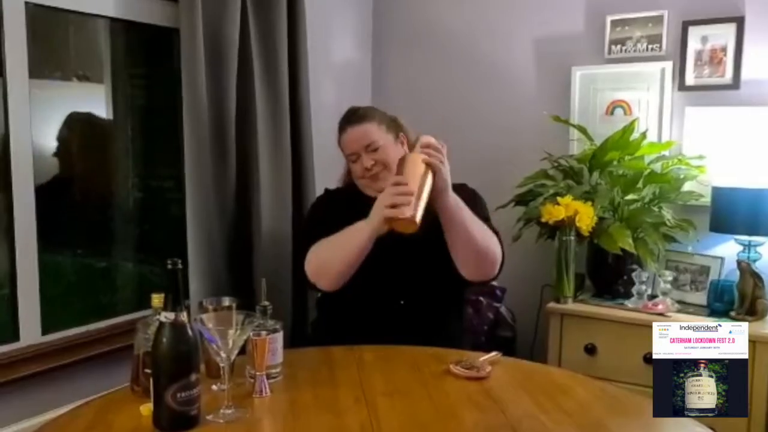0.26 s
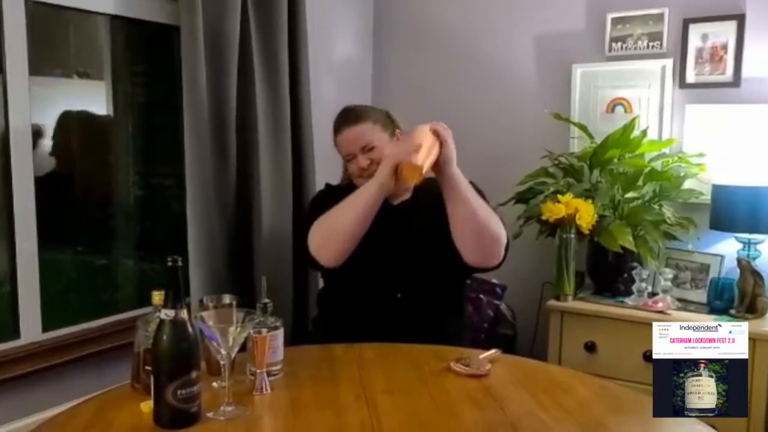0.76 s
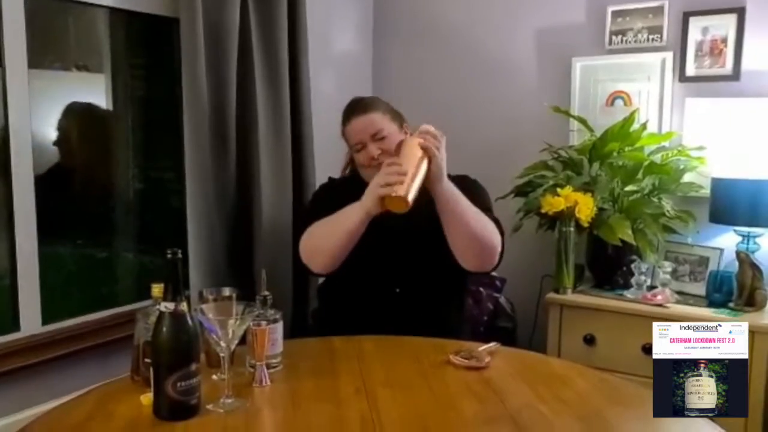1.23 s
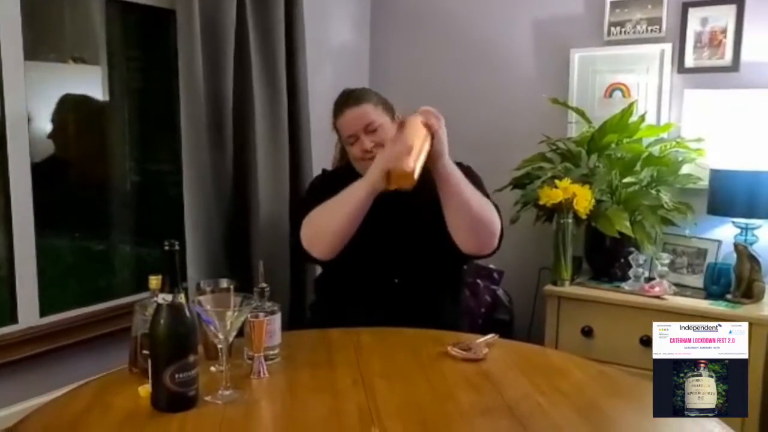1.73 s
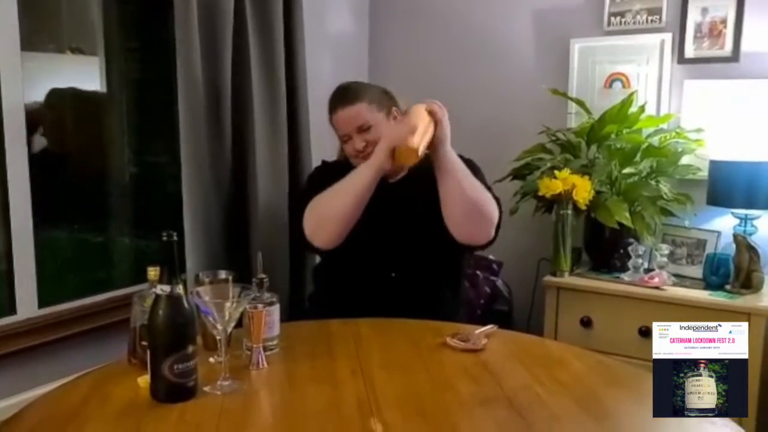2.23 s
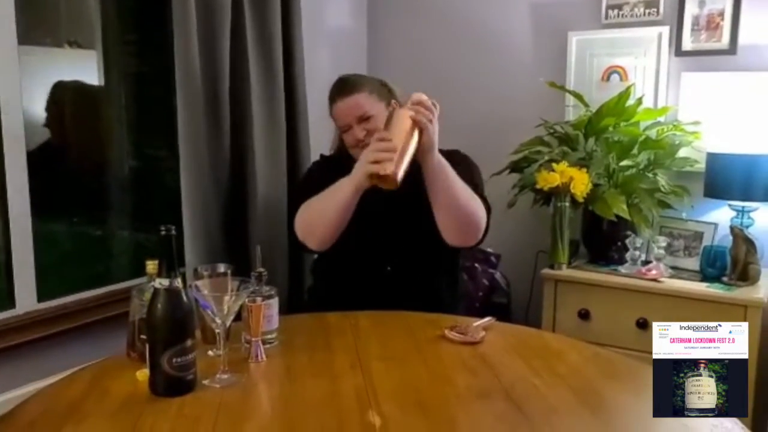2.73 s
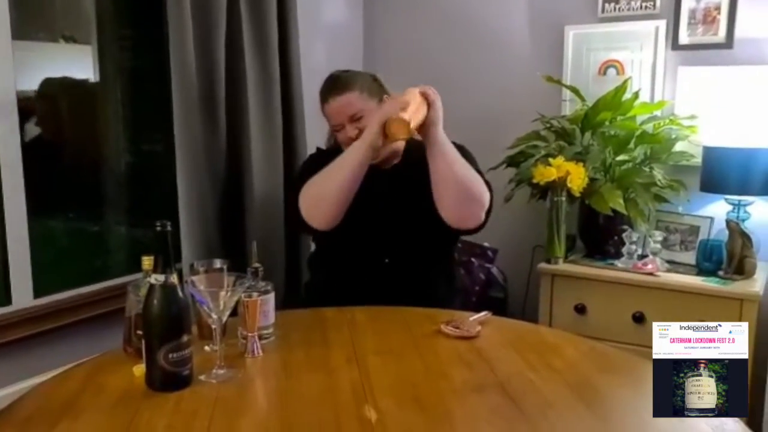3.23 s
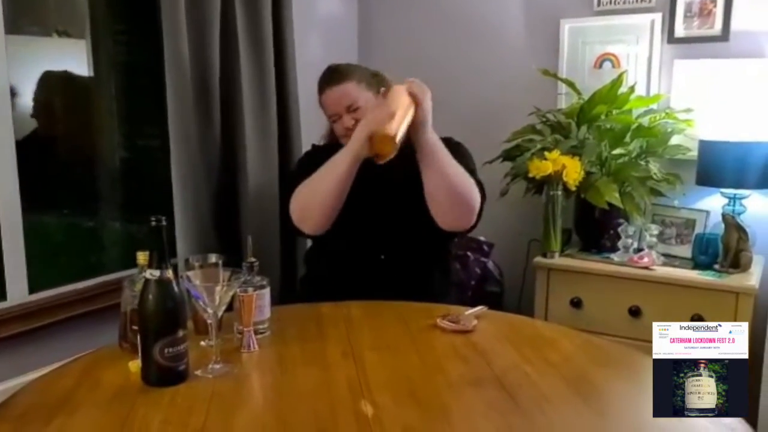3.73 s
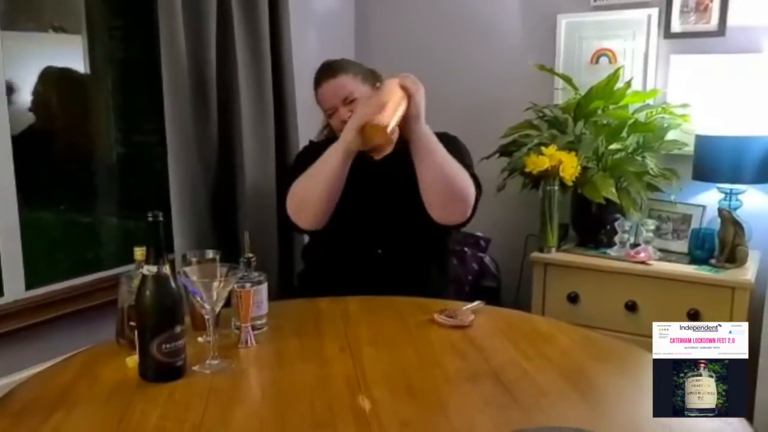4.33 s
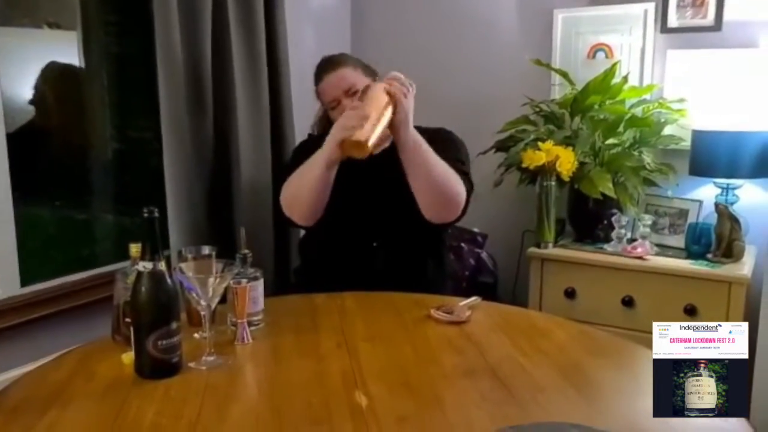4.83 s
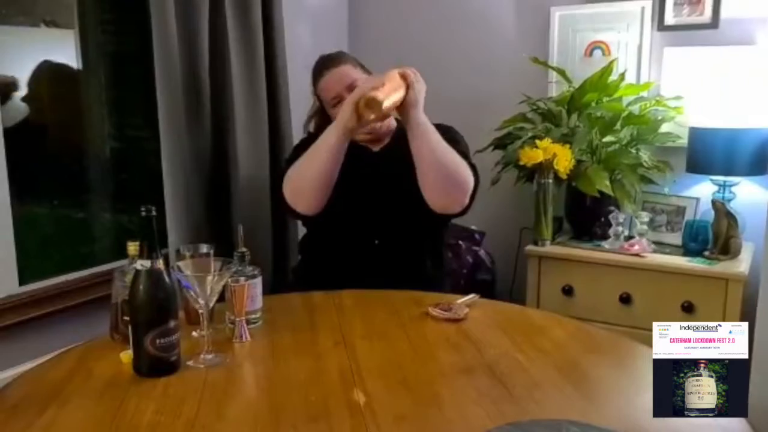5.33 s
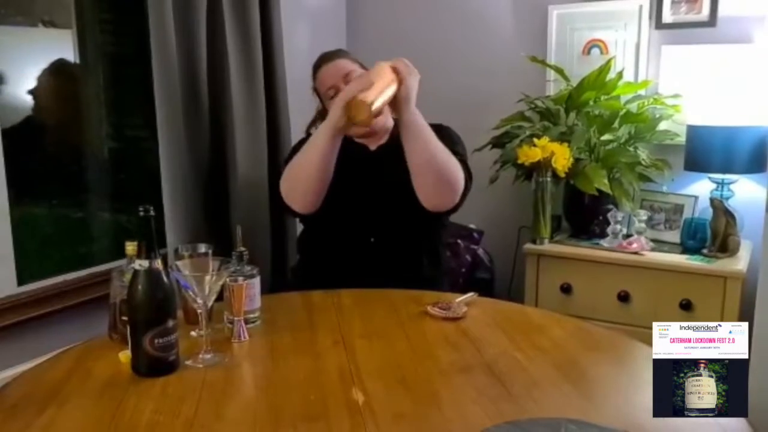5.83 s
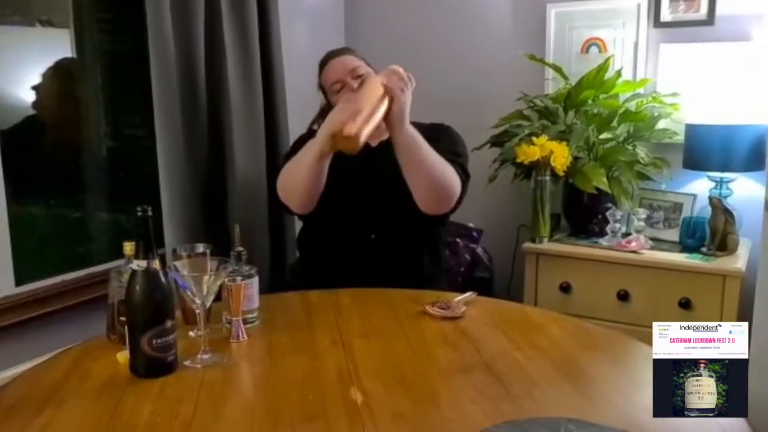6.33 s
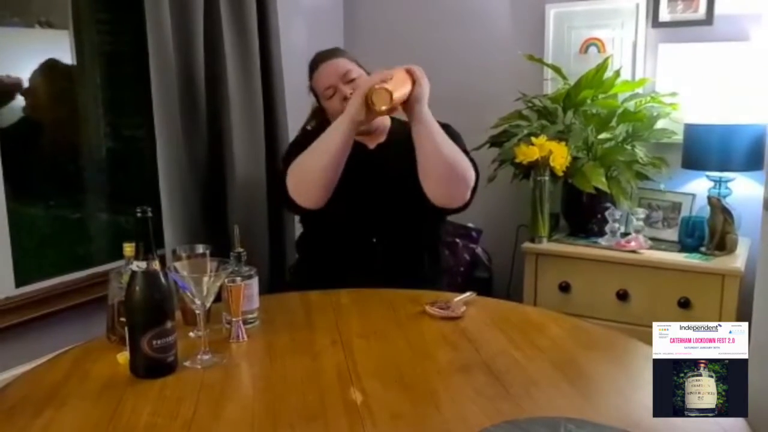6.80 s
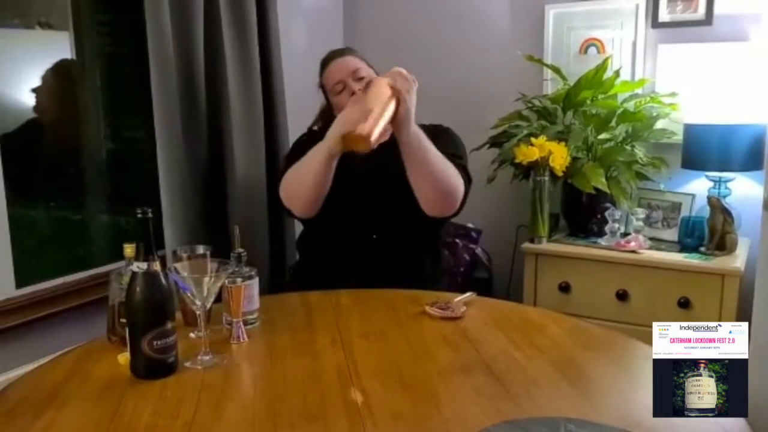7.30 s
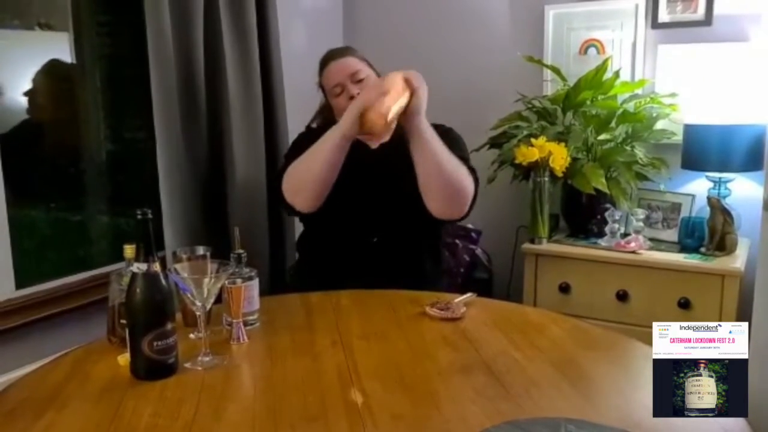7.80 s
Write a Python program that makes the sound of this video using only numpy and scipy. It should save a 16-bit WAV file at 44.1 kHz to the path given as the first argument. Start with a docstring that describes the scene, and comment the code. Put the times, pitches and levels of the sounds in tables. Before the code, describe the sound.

Vigorous cocktail shaking: rapid, bright metallic ice clatter with sloshing thumps, about six or seven crashes a second, in a lightly echoing room.

```python
"""A metal cocktail shaker full of ice and drink is shaken hard, across a table in a dining room.
About 6.6 times a second the load crashes into the narrow and the wide end by turns: random showers
of short strikes make the clatter and spray, and decaying modes make the thump and the ringing air.
Knocks and ticks stand out, and loose cubes tumble. Changing room echoes smear each crash, and the loudest
peaks overload the microphone. Underneath lie a low house rumble, a wavering drone and two soft bumps."""
import sys
import numpy as np
from scipy import signal
from scipy.fft import rfft, irfft, next_fast_len
from scipy.io import wavfile
from scipy.ndimage import uniform_filter1d

SR = 44100
rng = np.random.default_rng(int(sys.argv[2]) if len(sys.argv) > 2 else 0)


def output_pcm(signal):
    """Save a mono or channel-first signal as 16-bit PCM at the path in sys.argv[1].

    Samples are clipped to [-1, 1] before scaling.
    """
    pcm = np.clip(np.atleast_2d(signal).T, -1, 1) * 32767
    wavfile.write(sys.argv[1], SR, np.round(pcm).astype(np.int16))


N = 355357
TIME = np.arange(N) / SR  # seconds


def gain_of(db):
    """Decibels to amplitude."""
    return 10 ** (np.asarray(db) / 20)


def unit(x):
    """Scales each response to energy 1."""
    return x / np.sqrt(np.sum(x ** 2, -1, keepdims=True) + 1e-20)


def read(points, hz):
    """Reads a curve on a log-frequency axis."""
    f, value = np.transpose(points)
    return np.interp(np.log(hz + 1), np.log(f + 1), value)


def add(mix, s, sound):
    """Mixes a sound in at time s, in seconds."""
    part = mix[max(round(s * SR), 0):][:len(sound)]
    part += sound[:len(part)]


# Likeness of the two microphone ports. Each row: frequency in Hz, correlation.
PORT_LIKENESS = [(50, 0.87), (300, 0.9), (550, 0.73), (900, 0), (15000, 0.066)]
# Colour of the ports. Each row: frequency in Hz, left minus right in dB.
PORT_COLOUR = [(300, 0), (600, -1), (1000, 0.5), (1300, 6), (1950, -1), (2350, 0.5), (3150, 0),
               (3500, -4.5), (5500, 0)]


def ports(pair):
    """Two close ports share the bass, and each colours the treble in its own way."""
    hz = np.fft.rfftfreq(pair.shape[1], 1 / SR)
    a, b = rfft(pair)
    same = np.clip(read(PORT_LIKENESS, hz), -1, 1)
    mid = a * np.sqrt((1 + same) / 2)
    side = b * np.sqrt((1 - same) / 2)
    tilt = gain_of(read(PORT_COLOUR, hz) / 2)  # half the difference on each side
    return irfft(np.array([(mid + side) * tilt, (mid - side) / tilt]), pair.shape[1])


# Spectrum of the house background. Each row: frequency in Hz, relative level in dB per Hz.
RUMBLE_SPECTRUM = [(20, -10), (44, -8), (70, -3), (100, 1.5), (130, -21), (400, -24), (16000, -53)]
# Swells of the drone. Each row: time in seconds, level in dB.
DRONE_LEVEL = [(0, -47), (1.1, -54), (2, -47), (2.6, -49), (3.7, -54), (4.35, -42.5), (4.8, -52),
               (5.6, -53), (8, -59)]


def rumble(db=-55, drone_hz=58, width_hz=3):
    """The low background of the house is shaped noise; narrow-band noise makes a wavering drone."""
    size = next_fast_len(N)
    hz = np.fft.rfftfreq(size, 1 / SR)
    shaped = rfft(rng.standard_normal((2, size))) * gain_of(read(RUMBLE_SPECTRUM, hz))
    noise = ports(irfft(shaped, size))[:, :N]
    resonance = 1 / (1 + ((hz - drone_hz) / width_hz) ** 2)
    drone = irfft(rfft(rng.standard_normal(size)) * resonance, size)[:N]
    drone_gain = gain_of(np.interp(TIME, *np.transpose(DRONE_LEVEL)))
    return gain_of(db) * noise / noise.std() + drone_gain * drone / drone.std()


# Soft low bumps between the crashes. Each row: start in seconds, level at the top of the swell in dB.
SOFT_BUMPS = [(1.33, -42.5), (2.55, -42)]


def bumps(low_hz=65, high_hz=110, rise_s=0.03):
    """Dull bumps of low-band noise that swell and die away."""
    t = np.arange(SR // 2) / SR
    band = signal.butter(3, [low_hz, high_hz], "band", fs=SR, output="sos")
    swell = t / rise_s * np.exp(1 - t / rise_s)
    out = np.zeros(N)
    for s, db in SOFT_BUMPS:
        noise = signal.sosfilt(band, rng.standard_normal(len(t)))
        add(out, s, gain_of(db) * swell * noise / noise.std())
    return out


# Decay of the room's tail. Each row: frequency in Hz, time to fall by 60 dB in seconds.
ROOM_DECAY = [(150, 0.33), (600, 0.23), (2500, 0.28), (6000, 0.27), (15000, 0.18)]


def echoes(direct_db=-11, early_db=-2.5, early_s=0.0063, tail_db=-4.5, size=14000):
    """One place of the shaker: direct path, quick bounces off hands, table and corner, then the tail."""
    t = np.arange(size) / SR
    reflections = rng.random((2, 2, size)) < 3500 / SR  # 3500 a second
    early, late = rng.standard_normal((2, 2, size)) * reflections
    hz, s, z = signal.stft(late, SR, nperseg=256)
    decay = gain_of(-60 * s / read(ROOM_DECAY, hz)[:, None])
    tail = signal.istft(z * decay, SR, nperseg=256)[1][:, :size]
    response = gain_of(early_db) * unit(early * np.exp(-t / early_s)) + gain_of(tail_db) * unit(tail)
    # silence in front keeps the filter from wrapping round
    response = ports(np.pad(response, ((0, 0), (size, 0))))[:, size:]
    # the direct sound reaches the right port two samples later
    response[[0, 1], [0, 2]] += gain_of(direct_db)
    return response


def room(x, count=64, size=1600):
    """The shaker moves so fast that its pattern of echoes changes several times in each stroke."""
    places = [echoes() for _ in range(count)]
    fade = signal.windows.cosine(size)
    padded = np.pad(x, size)
    out = np.zeros((2, len(padded)))
    for at in range(0, N + size, size // 2):  # half-overlapping slices
        piece = padded[at:at + size] * fade
        wet = signal.fftconvolve(piece[None], places[rng.integers(count)], axes=1)
        for channel, sound in zip(out, wet):
            add(channel, at / SR, sound)
    return out[:, size:size + N]


def ring(modes, detune, size=4096):
    """Decaying modes; where the blow lands sets the share of each."""
    hz, width, db = np.transpose(modes)[:, :, None]
    t = np.arange(size) / SR
    share = rng.standard_normal(hz.shape) * gain_of(db) * np.sqrt(width)
    tuning = np.exp(detune * rng.standard_normal())
    decay = np.exp(-np.pi * width * t)
    wave = np.sum(share * decay * np.sin(2 * np.pi * hz * tuning * t), 0)
    # the ring is cut off below its lowest mode
    high_pass = signal.butter(3, 0.79 * hz.min(), "high", fs=SR, output="sos")
    return unit(signal.sosfilt(high_pass, wave))


def causal(gain):
    """The sharpest click that has this magnitude spectrum: the minimum-phase one."""
    both_sides = np.r_[gain, gain[-2:0:-1]]
    log_gain = np.log(np.maximum(both_sides, 1e-5))
    return np.fft.ifft(np.exp(signal.hilbert(log_gain).conj())).real


# Modes of the metal wall. Each row: frequency in Hz, width in Hz, relative level in dB.
WALL_MODES = [(1547, 140, 0), (1780, 35, 0), (2190, 29, -1), (2442, 84, 1.5), (2637, 66, 2), (2922, 48, 3),
              (3110, 66, 2.5), (3717, 130, 2), (6930, 160, -5)]


def strike(spectrum, contact_hz, octaves, ring_db, size=4096):
    """Ice meets metal: a click centred on the contact pitch, and a short ring of the hand-damped wall."""
    hz = np.fft.rfftfreq(size, 1 / SR)
    contact = 1 / np.sqrt(1 + (np.log2((hz + 1) / contact_hz) / octaves) ** 2)
    click = causal(gain_of(read(spectrum, hz)) * contact)
    wall = gain_of(ring_db) * ring(WALL_MODES, detune=0.012)
    wall[0] += 1  # the click itself
    return unit(signal.fftconvolve(click, wall)[:size])


# Crashes of the load, into the narrow and the wide end by turns. Each row: start in seconds, basic pile-up
# time in seconds, basic settling time in seconds, force of the ice in dB, force of the drink in dB;
# each layer scales the times and forces its own way.
CRASHES = [(-0.031, 0.044, 0.029, -1, 0), (0.165, 0.017, 0.012, 5.5, 6.5), (0.319, 0.015, 0.016, -1.5, 0.5),
           (0.46, 0.015, 0.023, 5.5, 4.5), (0.601, 0.016, 0.019, 1, 3), (0.761, 0.028, 0.02, -3.5, 1.5),
           (0.908, 0.012, 0.025, 0.5, 1.5), (1.063, 0.012, 0.017, 5.5, 6), (1.18, 0.028, 0.05, -3, -3.5),
           (1.425, 0.088, 0.046, -4.0, -9), (1.59, 0.02, 0.0033, 7.5, 0.5),
           (1.731, 0.0065, 0.038, 1.0, -3.5), (1.89, 0.025, 0.015, -2.5, 2), (2.019, 0.032, 0.034, 0, -1.5),
           (2.195, 0.023, 0.017, 3.5, -1.5), (2.323, 0.044, 0.022, -4.5, -2),
           (2.498, 0.026, 0.016, 1.5, -0.5), (2.658, 0.023, 0.03, -2.5, -3.5),
           (2.775, 0.048, 0.033, -3, -7.0), (2.929, 0.064, 0.019, 1, -0.5), (3.114, 0.014, 0.024, 1.5, 4),
           (3.275, 0.012, 0.042, -3, -3), (3.421, 0.027, 0.016, -2.5, 2), (3.576, 0.027, 0.026, 0.0, 1.5),
           (3.702, 0.059, 0.0089, -5, -0.5), (3.865, 0.026, 0.037, -1, 1), (4.002, 0.028, 0.025, 0.5, -2),
           (4.168, 0.027, 0.019, 1.5, 2), (4.3, 0.032, 0.024, -0.5, -4), (4.432, 0.043, 0.032, -2.5, 0.0),
           (4.595, 0.026, 0.048, -1.5, -3.5), (4.758, 0.01, 0.017, 2.5, 4), (4.911, 0.011, 0.02, 4.5, 2),
           (5.063, 0.015, 0.019, 1, 2.5), (5.188, 0.022, 0.045, -3.5, -6),
           (5.339, 0.0093, 0.052, -2.5, 2.5), (5.49, 0.008, 0.041, 0, 0.5), (5.643, 0.031, 0.021, 2, 4.5),
           (5.785, 0.038, 0.028, 1.5, -0.5), (5.95, 0.038, 0.009, 1, 2), (6.109, 0.02, 0.024, -0.5, 2.5),
           (6.279, 0.008, 0.027, 1.5, 4), (6.403, 0.015, 0.037, -0.5, 3), (6.572, 0.026, 0.017, 2, 4.5),
           (6.712, 0.017, 0.033, 0, -0.0), (6.857, 0.056, 0.014, -1, 2), (7.005, 0.023, 0.052, 0, -2.5),
           (7.16, 0.03, 0.023, -2.5, 0), (7.306, 0.042, 0.019, 1, -2), (7.477, 0.023, 0.018, 3, 4),
           (7.596, 0.051, 0.035, -2, -5), (7.729, 0.068, 0.029, -3.5, -0.5),
           (7.931, 0.014, 0.028, -3, -0.5)]


def levels(ends_db, force_db):
    """Level of each crash: set by the end it hits and by its force."""
    return np.resize(ends_db, len(CRASHES)) + force_db


def crashes(levels_db, first_db=-7, pile_share=1.0, settle_share=0.85, steepness=1.65):
    """Power over time: the front of the load lands at once, the rest piles in, then it settles."""
    power = np.zeros(N)
    for (s, pile, settle, *_), db in zip(CRASHES, levels_db):
        pile *= pile_share
        settle *= settle_share
        # a crash that began before the start is joined midway
        t = np.arange(max(-s, 0), max(pile + 3 * settle, -s), 1 / SR)
        piling = gain_of(first_db * (1.5 - t / pile)) ** 2
        settling = np.exp(-(abs(t - pile) / settle) ** steepness)
        add(power, s, gain_of(db) ** 2 * np.where(t < pile, piling, settling))
    return power


def shower(power, per_s, spread_db, sounds, size=700):
    """Random impacts share out the power of the moment; each picks one of the sounds."""
    strength = gain_of(spread_db * np.minimum(rng.exponential(1, N), 4))
    hits = (rng.random(N) < per_s / SR) * strength
    local = uniform_filter1d(uniform_filter1d(hits ** 2, size), size)
    share = np.sqrt(power / (abs(local) + 0.026 * np.mean(hits ** 2)))
    hits = hits * rng.choice([-1, 1], N) * share
    pick = rng.integers(0, len(sounds), N)
    out = np.zeros(N)
    for at in np.flatnonzero(hits):
        add(out, at / SR, hits[at] * sounds[pick[at]])
    return out


# Modes of the drink's thump. Each row: frequency in Hz, width in Hz, relative level in dB.
THUMP_MODES = [(192, 33, -6.5), (214.4, 9.4, -5.5), (254, 9.9, -17), (303, 43, 9.5), (370, 83, 7)]
# Thump before force and mix gain: level at the narrow end in dB, level at the wide end in dB.
THUMP_ENDS = (-34.5, -42.5)


def thump(count=48, froth_db_per_s=-0.62):
    """The liquid runs ahead of the ice and thumps into the end; growing froth cushions it more and more."""
    s, _, _, _, drink_db = np.transpose(CRASHES)
    thumps = [ring(THUMP_MODES, detune=0.019) for _ in range(count)]
    force_db = 0.83 * drink_db + froth_db_per_s * (s - s.mean())
    power = crashes(levels(THUMP_ENDS, force_db), first_db=-2.0, pile_share=0.69)
    return gain_of(5.5) * shower(power, per_s=400, spread_db=3.0, sounds=thumps)


# Modes of the air at the wide end. Each row: frequency in Hz, width in Hz, relative level in dB.
WIDE_MODES = [(537, 77, -4.5), (596, 96, 0), (750, 220, -7)]
# This air before force and mix gain: level at the narrow end in dB, level at the wide end in dB.
WIDE_ENDS = (-25, -23)


def wide_pocket(count=48):
    """Slaps of drink ring the lower air pocket, whose size changes from slap to slap."""
    drink_db = np.transpose(CRASHES)[4]
    pockets = [ring(WIDE_MODES, detune=0.064) for _ in range(count)]
    power = crashes(levels(WIDE_ENDS, 0.71 * drink_db), first_db=-4.0)
    return gain_of(3.5) * shower(power, per_s=450, spread_db=3.0, sounds=pockets)


# Modes of the air at the narrow end. Each row: frequency in Hz, width in Hz, relative level in dB.
NARROW_MODES = [(1049, 165, 1.5), (1110, 350, -5.5), (1283, 120, -1.5)]
# This air before force and mix gain: level at the narrow end in dB, level at the wide end in dB.
NARROW_ENDS = (-17.5, -24.5)


def narrow_pocket(count=48):
    """Slaps of drink ring the higher air pocket, whose size changes from slap to slap."""
    drink_db = np.transpose(CRASHES)[4]
    pockets = [ring(NARROW_MODES, detune=0.063) for _ in range(count)]
    power = crashes(levels(NARROW_ENDS, 0.97 * drink_db), first_db=-1.0, pile_share=0.85)
    return gain_of(1.24) * shower(power, per_s=450, spread_db=2.5, sounds=pockets)


# Spectrum of knocks and slaps. Each row: frequency in Hz, relative level in dB per Hz.
KNOCK_SPECTRUM = [(130, -28), (300, -19), (550, -6.5), (2700, 4), (4200, -1), (7500, -4), (12500, -5),
                  (15000, -6)]
# First slap before force: level at the narrow end in dB, level at the wide end in dB.
SLAP_ENDS = (13.5, 8.5)
# First slap: contact pitch at the narrow end in Hz, contact pitch at the wide end in Hz.
SLAP_PITCH = (825, 1450)


def slaps(pocket_db=-6.0):
    """The front of the load meets the end with one slap, which rings the air pocket of that end."""
    start, _, _, _, drink_db = np.transpose(CRASHES)
    out = np.zeros(N)
    for k, (s, db) in enumerate(zip(start, levels(SLAP_ENDS, 0.89 * drink_db))):
        pocket = ring((NARROW_MODES, WIDE_MODES)[k % 2], detune=0.032)
        blow = strike(KNOCK_SPECTRUM, SLAP_PITCH[k % 2], octaves=1.6, ring_db=-13.5)
        add(out, s, gain_of(db) * (blow + gain_of(pocket_db) * pocket))
    return out


# Loose cubes between the crashes. Each row: time in seconds, level in dB before the lead-in and mix gain.
TUMBLE_LEVEL = [(0, -26), (.14, -28), (.27, -18.5), (1.2, -22.5), (1.33, -35), (1.4, -26.5), (1.46, -29),
                (1.7, -24.5), (1.85, -21.5), (8, -20)]


def tumbling(slide_db=5.0, slide_s=0.01, flight_db=-4, flight_s=0.0052):
    """Power of the loose cubes; they slide down the wall ahead of each crash and fly free just before it."""
    starts = np.sort([row[0] for row in CRASHES] + [TIME[-1] + 1])
    wait = starts[np.searchsorted(starts, TIME)] - TIME  # seconds to the next crash
    lead_db = slide_db * np.exp(-wait / slide_s) + flight_db * np.exp(-wait / flight_s)
    return gain_of(np.interp(TIME, *np.transpose(TUMBLE_LEVEL)) + lead_db) ** 2


def fizz(db=-6, froth_db_per_s=0.3, slide_db=5, slide_s=0.012):
    """Power of droplets between crashes: they run down the wall ahead of the load, more as it froths."""
    froth_db = froth_db_per_s * (TIME - TIME.mean())
    return gain_of(db + froth_db) ** 2 * tumbling(slide_db, slide_s, flight_db=0.5)


# Spectrum of chips and droplets. Each row: frequency in Hz, relative level in dB per Hz.
SPRAY_SPECTRUM = [(130, -63), (2000, -12), (4000, 3), (6700, 0), (7400, -3), (12500, -2.5), (14500, -13.5),
                  (16000, -6.5)]
# Spray before force and mix gain: level at the narrow end in dB, level at the wide end in dB.
SPRAY_ENDS = (-13.5, -16.5)


def spray(count=64):
    """Crushed ice and droplets spray: a dense shower of tiny, bright strikes that barely ring the wall."""
    ice_db = np.transpose(CRASHES)[3]
    pitches = np.geomspace(4000, 15000, count)  # Hz
    chips = [strike(SPRAY_SPECTRUM, hz, octaves=1.14, ring_db=-38) for hz in pitches]
    power = crashes(levels(SPRAY_ENDS, 0.95 * ice_db), first_db=-3.0, settle_share=1.0) + fizz()
    return gain_of(-0.48) * shower(power, per_s=2200, spread_db=3.5, sounds=chips)


# Spectrum of cubes on the wall. Each row: frequency in Hz, relative level in dB per Hz.
CLATTER_SPECTRUM = [(130, -38), (300, -40), (600, -7), (1000, -6), (1600, -3.5), (2700, -1.5), (4200, -5.5),
                    (5500, -11.5), (7000, -13.5), (15000, -15)]
# Clatter before force and mix gain: level at the narrow end in dB, level at the wide end in dB.
CLATTER_ENDS = (-7, -7)


def clatter(count=64):
    """Cubes strike the wall: thick showers in the crashes, and a sparser tumble of loose ones throughout."""
    ice_db = np.transpose(CRASHES)[3]
    pitches = np.geomspace(1100, 5500, count)  # Hz
    cubes = [strike(CLATTER_SPECTRUM, hz, octaves=0.84, ring_db=-13.5) for hz in pitches]
    power = crashes(levels(CLATTER_ENDS, 0.69 * ice_db), first_db=-6.5, settle_share=1.027)
    crashing = shower(power, per_s=900, spread_db=3.0, sounds=cubes, size=400)
    loose = shower(tumbling(), per_s=280, spread_db=2.5, sounds=cubes, size=2000)
    return gain_of(-0.64) * crashing + gain_of(-0.86) * loose


# Knocks and ticks that stand out, from a faint bright tick to hard blows. Each row: start in seconds,
# energy in dB before the mix gain, contact pitch in Hz, low when the drink cushions the blow.
WALL_KNOCKS = [(0.325, 15, 1500), (0.628, 16, 2480), (0.763, 10, 2200), (0.798, 14.5, 2390),
               (0.928, 17.5, 1010), (1.477, 15.5, 790), (1.92, 19.5, 4300), (2.097, 24, 2680),
               (2.325, 14, 2200), (2.379, 19.5, 2400), (2.521, 14, 5040), (2.698, 16, 2850),
               (2.837, 15, 2400), (3.294, 15, 2820), (3.454, 16, 4160), (3.705, 12.5, 800),
               (3.753, 20.5, 2600), (4.302, 17, 2200), (4.433, 11.5, 2200), (4.596, 15, 2900),
               (4.633, 18.5, 978), (5.223, 17.5, 2820), (5.808, 15.5, 605), (6.814, 14, 2600),
               (6.879, 14, 2900), (7.194, 19.5, 1980), (7.275, 8, 8200), (7.74, 19.5, 2600),
               (7.94, 20.5, 4040)]


def knocks():
    """Knocks on the wall, from single cubes and the sharp fronts of some crashes: a click and short ring."""
    out = np.zeros(N)
    for s, db, hz in WALL_KNOCKS:
        add(out, s, gain_of(db) * strike(KNOCK_SPECTRUM, hz, octaves=0.61, ring_db=-12.0))
    return gain_of(3.1) * out


def scene():
    """The shaker in the room, over the house background."""
    drink = thump() + wide_pocket() + narrow_pocket()
    ice = spray() + clatter() + knocks()
    return rumble() + bumps() + room(drink + slaps() + ice)


def record(dry, ceiling=1.0, knee=5, edge_hz=15720):
    """The microphone rounds off the loudest peaks; then a steep low-pass limits the band."""
    rounded = dry / (1 + abs(dry / ceiling) ** knee) ** (1 / knee)
    low_pass = signal.firwin(511, edge_hz, window=("kaiser", 9), fs=SR)
    return signal.oaconvolve(rounded, low_pass[None], "same")


dry = scene()
out = record(dry)
output_pcm(out)
```